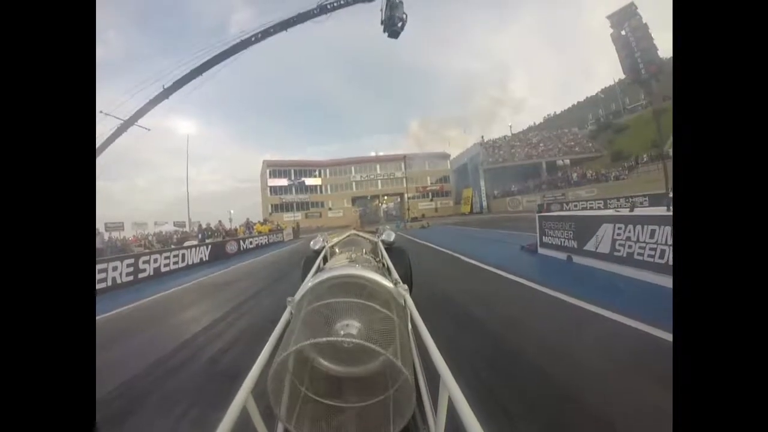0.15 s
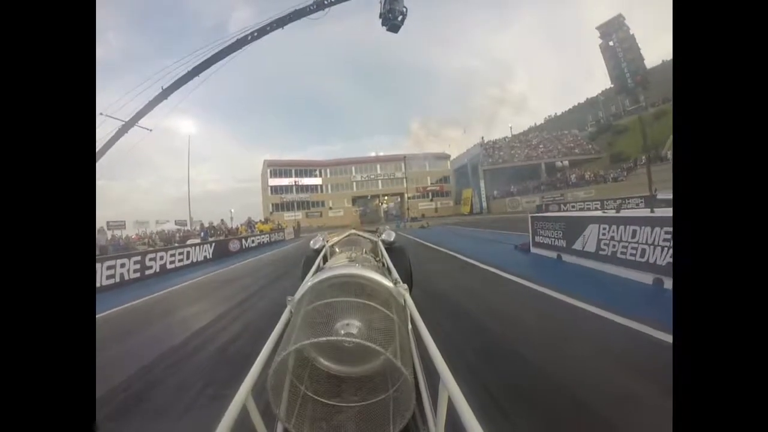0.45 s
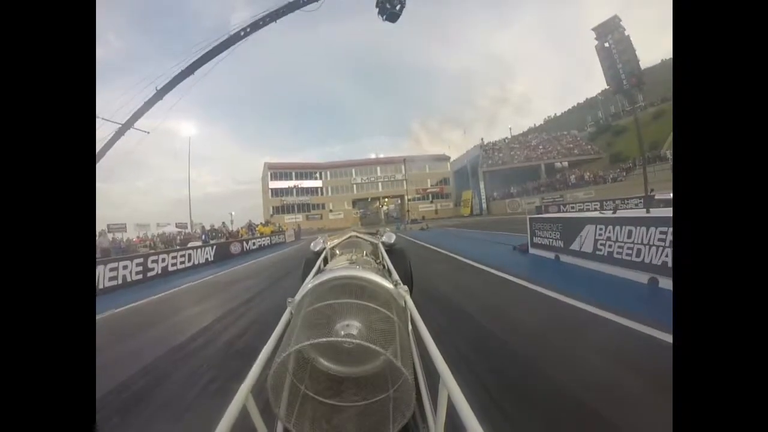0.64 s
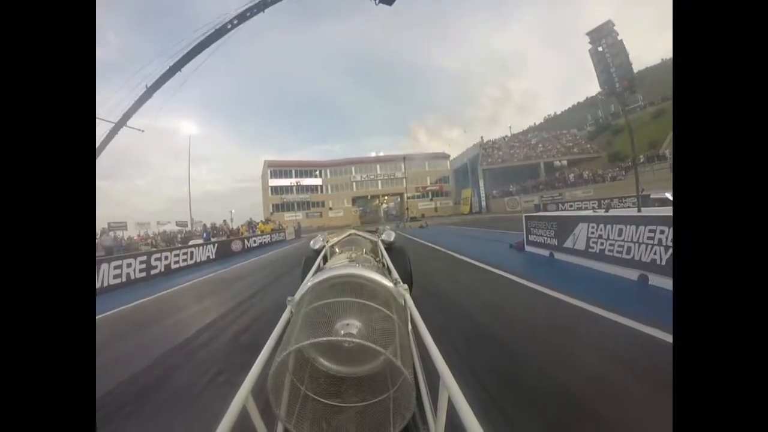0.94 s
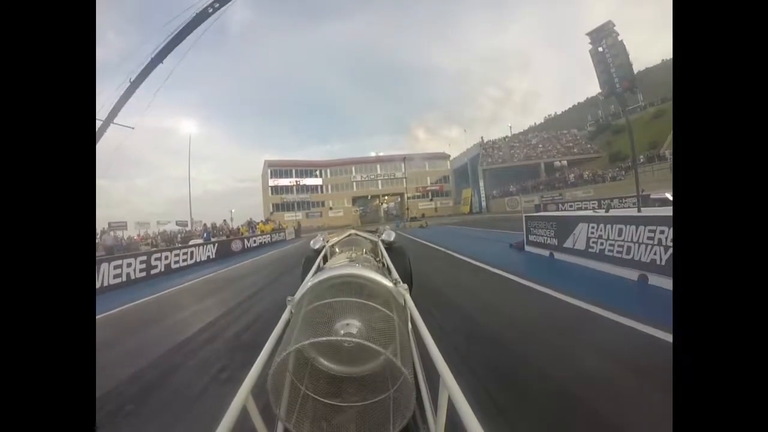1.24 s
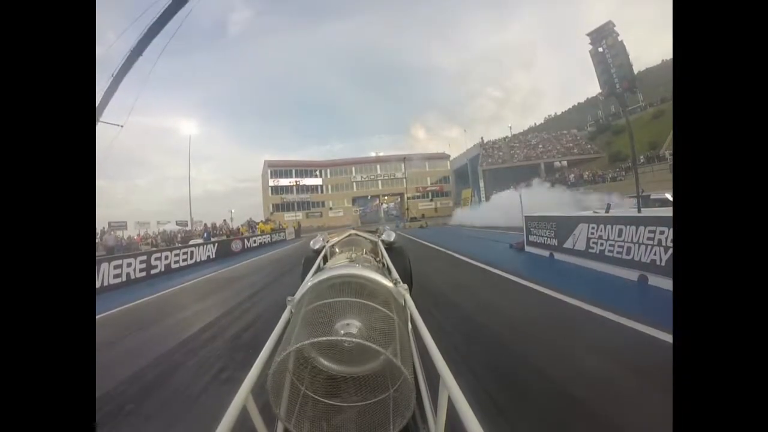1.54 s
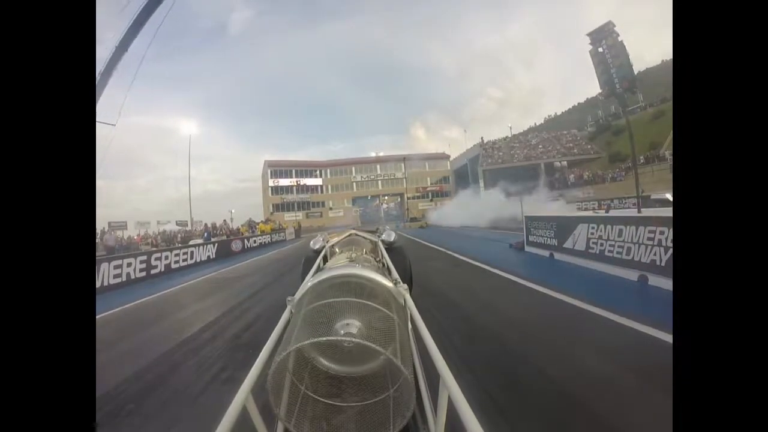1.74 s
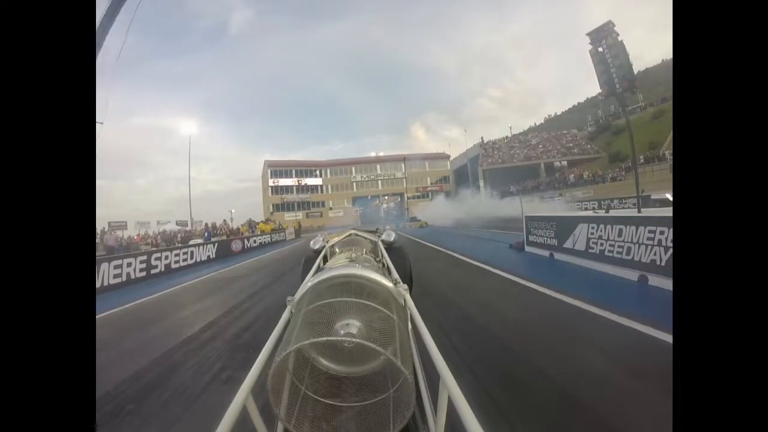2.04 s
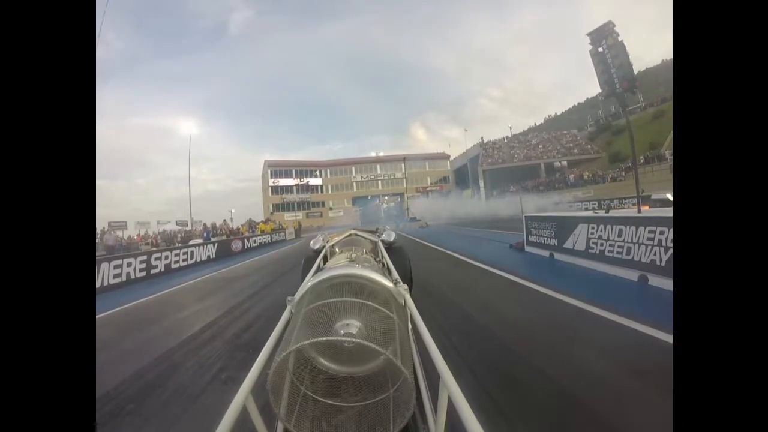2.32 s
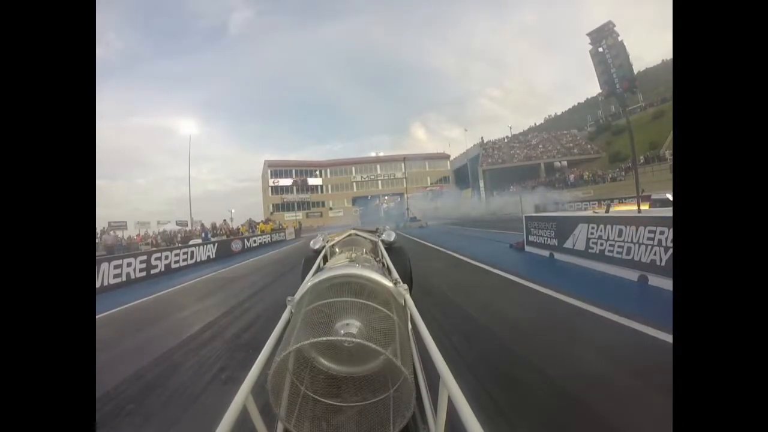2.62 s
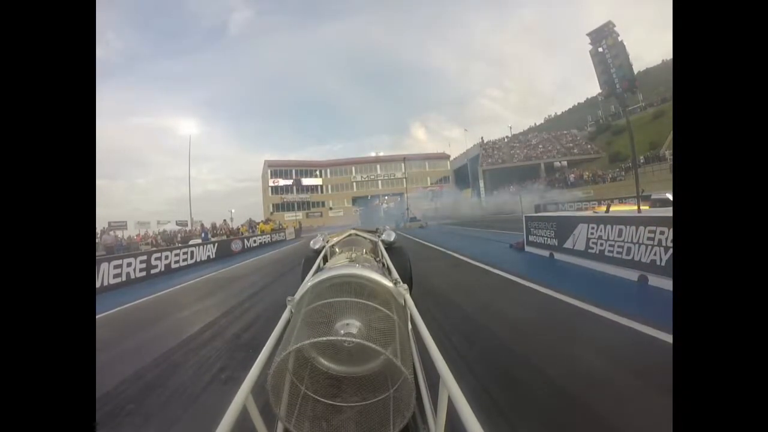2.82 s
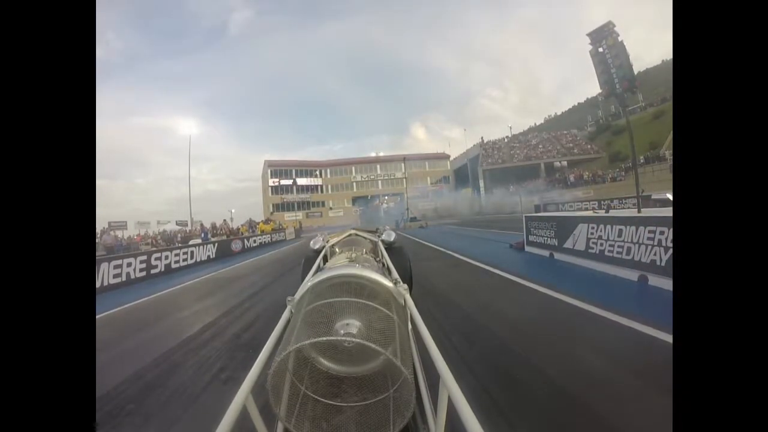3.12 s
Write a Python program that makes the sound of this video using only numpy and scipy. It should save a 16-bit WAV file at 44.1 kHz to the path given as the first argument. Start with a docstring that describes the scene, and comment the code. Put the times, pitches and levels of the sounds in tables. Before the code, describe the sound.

Jet engine idling on a drag strip, low hum and shrill whine, punctuated by deep thumping pops

```python
"""On a jet car, behind its idling turbine: the frame hums once per shaft turn, the compressor blades whistle
at 24 and 48 times that, and weaker multiples of the shaft speed sing in the intake hiss, which is filtered noise.
Afterburner pops ring the chassis as fading sines and leave a roar of noise; duller pops come from farther off.
A thin whistle, a single sine, glides down through most of the first second, then creeps up, growing louder,
and stops abruptly."""
import sys
import numpy as np
from scipy import signal
from scipy.fft import rfft, irfft, next_fast_len
from scipy.io import wavfile
from scipy.ndimage import uniform_filter1d, map_coordinates

SR = 44100
rng = np.random.default_rng(int(sys.argv[2]) if len(sys.argv) > 2 else 0)


def amplitude_ratio(level_db):
    """Convert a level in decibels to the matching linear amplitude (field) ratio."""
    exponent = np.asarray(level_db, float) / 20
    return 10 ** exponent


def materialize(psi):
    """Save the field psi as 16-bit PCM at rate SR to the path in sys.argv[1].

    A 1-D psi becomes a single channel; in a 2-D psi each row is a channel.
    """
    bounded = np.clip(np.atleast_2d(psi).T, -1, 1)
    quanta = np.round(bounded * 32767).astype(np.int16)
    wavfile.write(sys.argv[1], SR, quanta)


N = 144207  # length in samples

# The thin whistle's path. Each row: time in seconds, pitch in Hz, level in dB.
WHISTLE_PATH = [(0, 960, -40), (.1, 965, -39), (.19, 985, -34.5), (.22, 980, -32), (.29, 970, -34),
                (.33, 945, -40), (.44, 930, -35), (.48, 924, -32), (.57, 915, -28), (.61, 905, -43),
                (.66, 895, -34), (.72, 885, -50), (1.0, 878, -53), (1.1, 890.7, -41), (1.42, 912, -34.5),
                (1.45, 910, -61), (3.27, 915, -76)]
# Near pops. Each row: start in seconds, chassis level in dB, roar level in dB.
NEAR_POPS = [(.004, -7, -12.5), (0.319, -23, -18), (0.691, -8, -14), (.84, -40, -28)]
# Duller, far pops and their slaps. Each row: time in seconds, peak in dB.
DULL_POPS = [(1.655, -10.5), (1.685, -15), (1.702, -17)]
# How the chassis rings. Each row: pitch in Hz, level in dB against the pop, time to fall 60 dB in seconds.
CHASSIS_RINGS = [(39.35, -0.5, 0.84), (119, -5.5, 0.15), (167, -23, 0.21)]
# The chassis' after-shake. Each row: time in seconds, level in dB.
AFTER_SHAKE = [(0, -34), (.2, -30), (.48, -22.5), (.62, -33), (.95, -33), (1.1, -30), (1.45, -43),
               (3.27, -41.5)]
# Tone colour of the roar, only its shape counts. Each row: frequency in Hz, level in dB.
ROAR_COLOUR = [(40, 0.5), (120, 0.5), (400, -6.5), (900, -12), (1800, -11.5), (3000, -15), (8000, -55)]
# Tone colour of the hiss before the duct, only its shape counts. Each row: frequency in Hz, level in dB.
HISS_COLOUR = [(15, -68), (25, -27.5), (168, -17.5), (226, -8.5), (377, -27.5), (2280, -18), (2540, -19.5),
               (3230, -18.5), (4830, -26), (5530, -16.5), (6320, -26), (11100, -31), (15300, -43.5)]
# Resonances and dips of the intake duct. Each row: centre in Hz, width in Hz, boost or cut in dB.
DUCT = [(610, 120, -3), (880, 280, 3), (1260, 200, -3), (1540, 100, 2.5), (2130, 93, -6.5), (2253, 130, 4),
        (2492, 120, -10), (3234, 355, 9.5), (3900, 300, -1.5), (4605, 110, 8), (4730, 130, -8),
        (5340, 540, 8.5), (5730, 210, -8.5), (7830, 110, 6), (8820, 140, -1.5), (9600, 590, -3),
        (12300, 710, -2.5), (13400, 820, 7)]
# Shaft speed, which sags and recovers around the pops. Each row: time in seconds, speed in turns per second.
SHAFT_SPEED = [(0, 226), (.09, 223), (.15, 221.8), (.24, 221.6), (.39, 218.9), (.51, 221.1), (.63, 224.2),
               (.69, 225), (.81, 221.5), (.92, 219.4), (1.05, 221.6), (1.2, 225), (1.35, 227.2),
               (1.47, 228.1), (1.72, 229.3), (2.2, 230.1), (2.38, 230.2), (2.75, 228.7), (3.0, 228.05),
               (3.27, 227.6)]
# How loud the turbine's sounds are heard, with brief dips in level after pops. Each row: time in seconds,
# base of hiss and shaft orders in dB, frame hum in dB, blade whistle in dB, its octave in dB.
HEARD_LEVELS = [(0.0, -31, -10, -22.5, -33), (0.08, -31, -33, -12, -32), (0.1, -32.5, -19, -9.5, -33),
                (0.15, -33.5, -15, -19.5, -35), (0.24, -32, -12, -12, -32), (0.33, -32, -13.5, -21, -30),
                (0.36, -33, -11.5, -14, -34), (0.39, -31, -13.5, -26, -28), (0.42, -31.5, -11.5, -16, -33),
                (0.44, -32, -13, -28, -34), (0.49, -31.5, -12.5, -14, -25.5),
                (0.64, -32, -12.5, -19.5, -31), (0.66, -29.5, -12.5, -26, -24.5),
                (0.7, -31, -10.5, -25, -34), (0.77, -35, -19.5, -17, -28.5), (0.81, -34.5, -12, -20, -36),
                (0.95, -33.5, -15, -19, -30), (1.1, -34, -16, -16, -32.5), (1.25, -33.5, -15, -20.5, -30),
                (1.27, -30, -15, -26, -22.5), (1.29, -32, -17.5, -13.5, -30), (1.32, -33, -15, -30, -28),
                (1.35, -31, -17.5, -18.5, -25), (1.79, -29.5, -10.5, -20, -31.5),
                (1.96, -32.5, -12, -16, -30), (2.15, -31, -9.5, -21.5, -30), (2.41, -32.5, -12.5, -15, -29),
                (2.73, -30, -12, -22.5, -26.5), (2.8, -31, -14.5, -14, -25), (2.9, -32, -15.5, -19, -25.5),
                (2.92, -30, -15, -19, -37), (2.95, -30.5, -13.5, -14.5, -28),
                (3.02, -29.5, -13.5, -17, -25), (3.27, -30, -13.5, -15, -31)]
# Clean shaft orders. Each row: multiple of shaft speed (rounded when played), level in dB over the hiss base,
# dB gained per extra turn per second (limited when played).
SHAFT_ORDERS = [(2, -16.5, -1.5), (3.003, -14, .9), (7, -11, -1.2), (9.99, -6, 1), (10.96, -13, -1.5),
                (12.05, -5.5, -0.35), (13.03, 1, 0.8), (14.01, 3.5, 1.5), (18, -10.5, .3), (20.01, -8.5, 0),
                (21, -17.5, -0.8), (22, -12, 2.5), (30, -22, 4), (31, -20, -1), (34.1, -12.5, 5),
                (38, -17, 3)]
# Blade whistles, frayed by turbulence. Each row: multiple of shaft speed, core fray in dB against the pure tone,
# core width in Hz, skirt fray in dB against the pure tone, skirt width in Hz.
BLADE_WHISTLES = [(24, -6, 55, -6, 220), (48, -5, 70, -1.5, 700)]


def unit(x):
    """Scales a signal to an rms of 1."""
    return x / np.sqrt(np.mean(np.abs(x) ** 2) + 1e-20)


def curves(rows):
    """Joins the rows of a table by straight lines: one curve for each column after the time."""
    seconds, *columns = np.transpose(rows)
    return [np.interp(np.arange(N) / SR, seconds, column) for column in columns]


def wobble(rate):
    """A smooth random curve through rate random points a second."""
    return map_coordinates(rng.standard_normal(400), [np.arange(N) * rate / SR])


def coloured(points, x):
    """Filters x to the tone colour in points, joined on a log frequency axis."""
    point_hz, db = np.transpose(points)
    size = next_fast_len(N + 8192)
    hz = np.fft.rfftfreq(size, 1 / SR)
    gain = amplitude_ratio(np.interp(np.log(hz + 1), np.log(point_hz + 1), db))
    return irfft(rfft(x, size) * gain, size)[:N]


def fray(width_hz):
    """Slow complex noise of rms 1; multiplying a tone by it smears the tone over about width_hz."""
    hz = np.fft.fftfreq(N, 1 / SR)
    white = rng.standard_normal(N) + 1j * rng.standard_normal(N)
    return unit(np.fft.ifft(white / (1 + (2 * hz / width_hz) ** 2)))


def whistle():
    """A thin sine: first a falling tone, then a rise near four times the shaft speed that stops abruptly."""
    hz, db = curves(WHISTLE_PATH)
    phase = 2 * np.pi * np.cumsum(hz) / SR
    return np.sqrt(2) * amplitude_ratio(db + 1.9 * wobble(24.1)) * np.sin(phase)


def roar_swell(age):
    """A roar's loudness at a given age in seconds: a quick rise, then a steady decay in dB."""
    rise_s, fall_60db_s = 0.019, 0.72
    return (1 - np.exp(-age / rise_s)) * amplitude_ratio(-60 * age / fall_60db_s)


def pops():
    """Near pops ring the chassis and leave a dying roar; far pops are single dull pushes with a faint roar."""
    t = np.arange(N) / SR
    thumps, roar_size = np.zeros(N), np.zeros(N)
    for start, thump_db, roar_db in NEAR_POPS:
        age = np.clip(t - start, 0, None)
        for hz, db, fall_60db_s in CHASSIS_RINGS:
            thumps += amplitude_ratio(thump_db + db - 60 * age / fall_60db_s) * np.sin(2 * np.pi * hz * age)
        roar_size += amplitude_ratio(roar_db) * roar_swell(age)
    for start, db in DULL_POPS:
        u = (t - start) / 0.0036  # pulse width in seconds
        thumps += amplitude_ratio(db) * (1 - u ** 2) * np.exp(-u ** 2 / 2)
        roar_size += amplitude_ratio(db - 26) * roar_swell(np.clip(t - start, 0, None))
    lumps = amplitude_ratio(2 * wobble(45.2))  # uneven loudness of the roar
    roar = roar_size * lumps * unit(coloured(ROAR_COLOUR, rng.standard_normal(N)))
    lowest_ring = np.exp(2j * np.pi * CHASSIS_RINGS[0][0] * t)
    shake = np.sqrt(2) * np.real(unit(1 + 0.64 * fray(3.6)) * lowest_ring)
    return thumps + roar + amplitude_ratio(curves(AFTER_SHAKE)[0]) * shake


def hiss():
    """Intake air: noise with slightly patchy loudness, shaped by the duct's resonances."""
    patchy_db, over_base_db = 1.5, 12
    grid = signal.stft(rng.standard_normal(N), nperseg=512)[2]
    patches = uniform_filter1d(rng.standard_normal(grid.shape), size=6, axis=0)  # smooth over frequency
    patches = uniform_filter1d(patches, size=12, axis=1)  # smooth over time
    patchy = signal.istft(grid * amplitude_ratio(patchy_db * unit(patches)), nperseg=512)[1][:N]
    air = coloured(HISS_COLOUR, patchy)
    hz = np.fft.rfftfreq(N, 1 / SR)
    duct_db = sum(db / (1 + (2 * (hz - centre) / width) ** 2) for centre, width, db in DUCT)
    return amplitude_ratio(over_base_db) * unit(irfft(rfft(air) * amplitude_ratio(duct_db), N))


def turbine():
    """Hum, shaft orders and blade whistles all follow whole multiples of one shaft speed; hiss joins them."""
    usual_turns, order_waver_db, order_waver_rate = 229, 2, 16  # turns per second, dB, points per second
    hum_fuzz_db, hum_fuzz_hz = -21.5, 26.6
    turns = curves(SHAFT_SPEED)[0]
    base_db, hum_db, *blade_dbs = curves(HEARD_LEVELS)
    angle = 2 * np.pi * np.cumsum(turns) / SR

    def tone(multiple, shape):
        """A sine at a whole multiple of the shaft speed, its size and phase set by shape."""
        return np.sqrt(2) * np.real(shape * np.exp(1j * round(multiple) * angle))

    hum = tone(1, 1 + amplitude_ratio(hum_fuzz_db) * fray(hum_fuzz_hz))
    orders = np.zeros(N)
    for multiple, db, gain_per_turn in SHAFT_ORDERS:
        speed_db = np.clip(gain_per_turn, -.4, 1.2) * (turns - usual_turns)
        level = amplitude_ratio(db + speed_db + order_waver_db * wobble(order_waver_rate))
        random_phase = np.exp(2j * np.pi * rng.random())
        orders += tone(multiple, level * random_phase)
    blades = np.zeros(N)
    for db, (multiple, core_db, core_hz, skirt_db, skirt_hz) in zip(blade_dbs, BLADE_WHISTLES):
        frayed = unit(1 + amplitude_ratio(core_db) * fray(core_hz) + amplitude_ratio(skirt_db) * fray(skirt_hz))
        blades += tone(multiple, amplitude_ratio(db) * frayed)
    return amplitude_ratio(hum_db) * hum + blades + amplitude_ratio(base_db) * (orders + hiss())


def scene():
    """Adds all sources at one microphone."""
    return (whistle() + pops() + turbine())[None]


def roll_off(x):
    """The treble ends steeply here."""
    return signal.sosfilt(signal.butter(12, 15490, fs=SR, output="sos"), x)


def record(dry):
    """Rounds off the peaks softly and cuts off the top of the treble."""
    ceiling, knee, top_hz = 1.15, 6, 15220  # a higher knee bends more sharply
    clipped = dry / (1 + np.abs(dry / ceiling) ** knee) ** (1 / knee)
    mix = irfft(rfft(clipped) * (np.fft.rfftfreq(N, 1 / SR) < top_hz), N)
    return roll_off(mix)


dry = scene()
out = record(dry)
materialize(out)
```